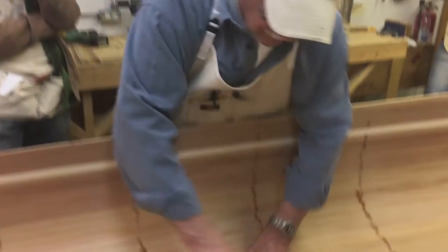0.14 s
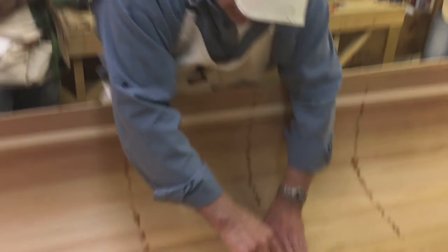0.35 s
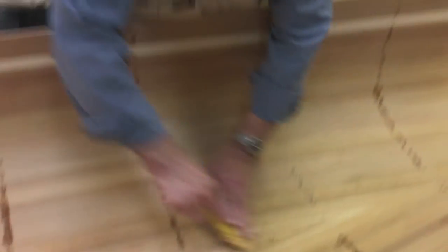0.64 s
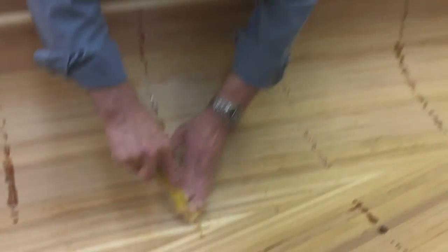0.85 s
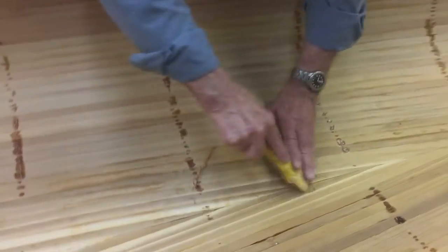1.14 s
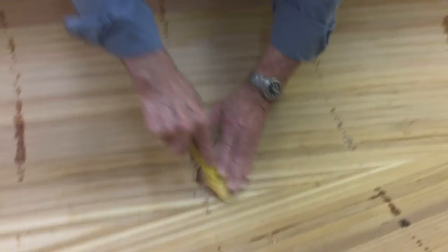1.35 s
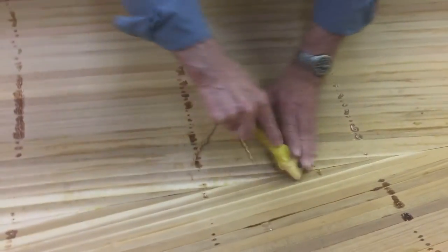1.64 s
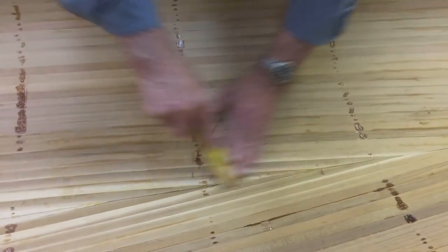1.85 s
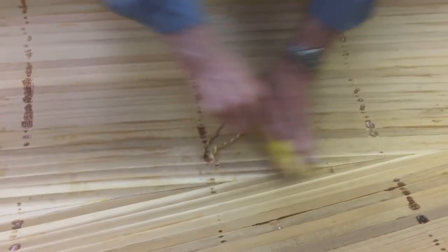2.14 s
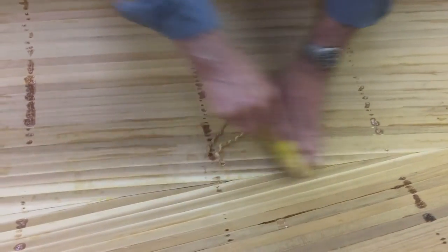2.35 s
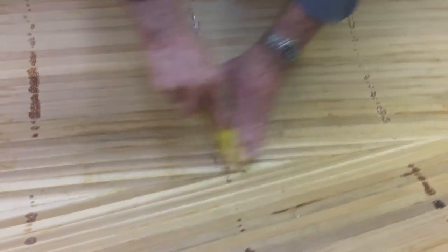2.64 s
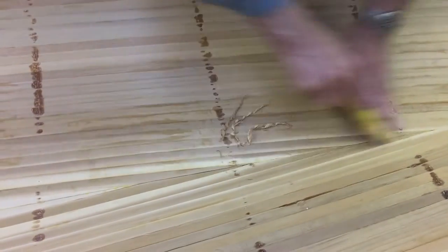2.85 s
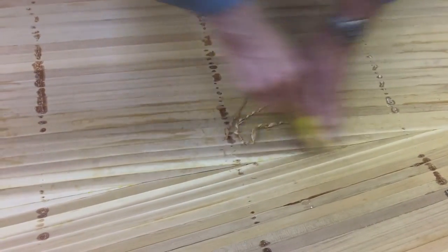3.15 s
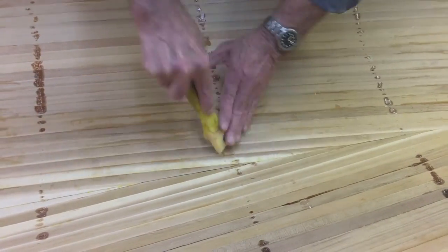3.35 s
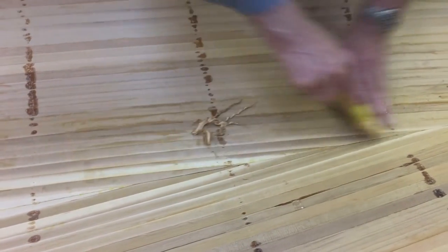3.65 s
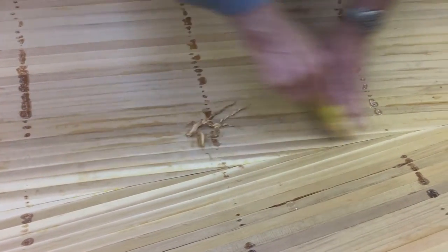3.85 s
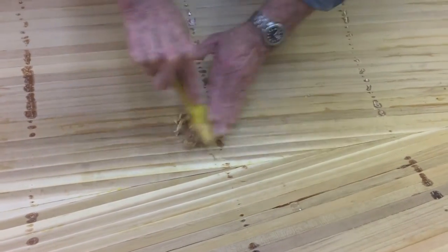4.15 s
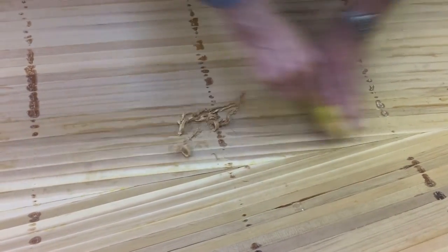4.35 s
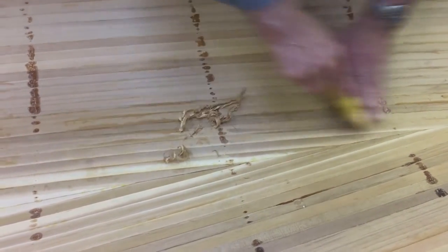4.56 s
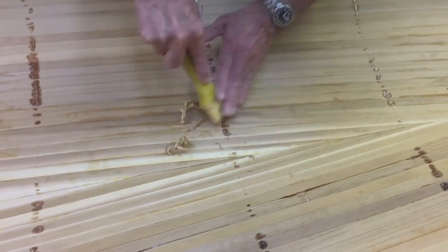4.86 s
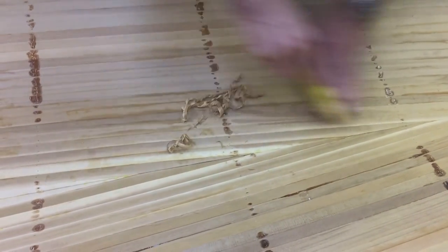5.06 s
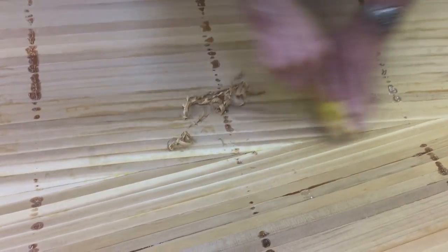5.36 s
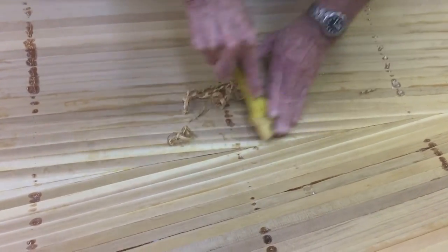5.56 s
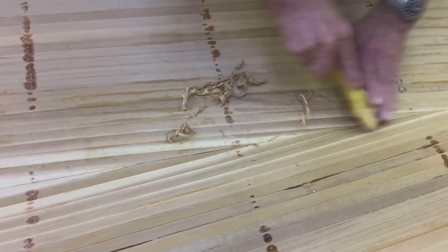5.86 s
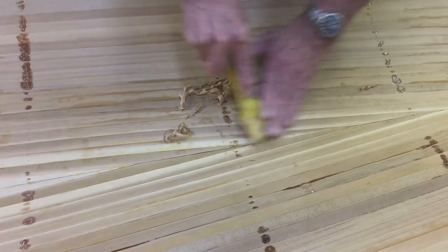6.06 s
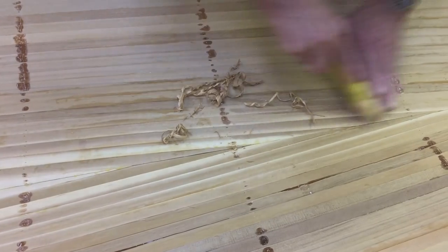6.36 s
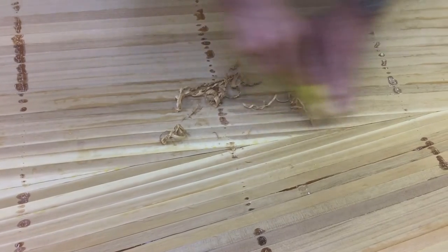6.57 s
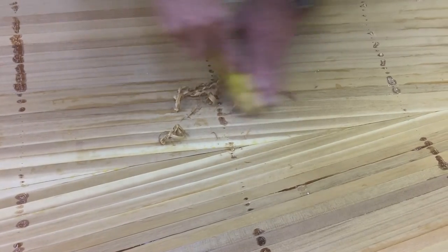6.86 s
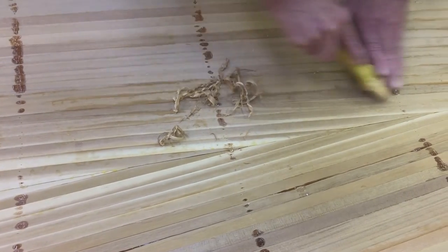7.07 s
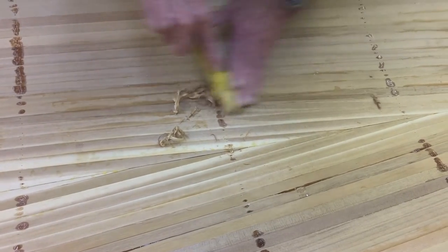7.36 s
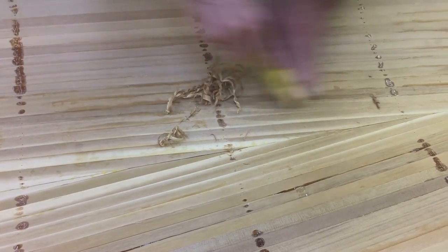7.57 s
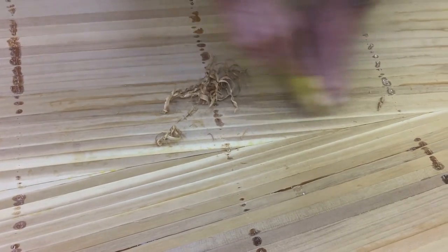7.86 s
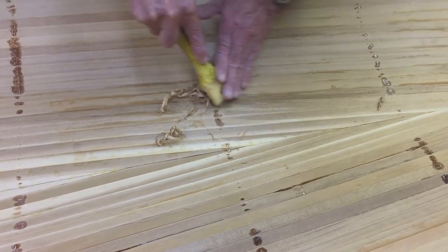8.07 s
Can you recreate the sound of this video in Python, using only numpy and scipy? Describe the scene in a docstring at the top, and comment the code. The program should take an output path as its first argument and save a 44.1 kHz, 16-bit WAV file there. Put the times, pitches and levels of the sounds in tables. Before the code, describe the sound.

A hand scraper rasps in twelve quick, bright pulls across a hollow thin wooden hull, with small thuds and clacks between strokes in a quiet workshop.

```python
"""In a workshop, a hand scraper works the inside of a thin wooden hull; one microphone close by, a quiet shop behind.
Between twelve quick pulls the blade is set down or slid lightly: steel clacks, the hull booms in its modes, the wood
is rubbed. In each pull it bites: random fibre fractures drive a dense rasp, a high singing edge and the planking.
Here and there come short bright crackles and brief chatter; a last light slide ends the work.
Room tails of decaying noise surround the blade, and steady shaped noise is the air of the shop."""
import sys
import numpy as np
from scipy import signal
from scipy.fft import rfft, irfft, next_fast_len
from scipy.io import wavfile

SR = 44100
rng = np.random.default_rng(int(sys.argv[2]) if len(sys.argv) > 2 else 0)


def generate_wav(signal):
    """Clip the signal to [-1, 1] and save it as 16-bit WAV at the path in sys.argv[1]."""
    frames = np.transpose(np.atleast_2d(signal))
    scaled = np.clip(frames, -1, 1) * 32767
    pcm = np.round(scaled).astype(np.int16)
    wavfile.write(sys.argv[1], SR, pcm)


N = 362061
TIME = np.arange(N) / SR   # s

PLANKING_FOLLOWS = 0.3   # share of the change in pressure that the hull follows
TOUCH_S, LIFT_S = 0.007, 0.0074   # the blade meets and leaves the wood


# Colour of the tearing fibres, close to the blade. Each row: frequency in Hz, relative density in dB per Hz.
RASP = [(500, -14), (1200, -1.5), (2100, 2), (2750, -1.5), (3230, 3.1), (3700, -1), (5200, -0.5),
        (6300, 1.5), (7000, -4), (7700, -12), (10000, -25), (16000, -39)]
# Colour of the singing steel edge. Each row: frequency in Hz, relative density in dB per Hz.
EDGE = [(5000, -27), (7600, -10), (8600, -1), (10200, 0), (11000, 1), (12400, 2), (13300, -6.5),
        (16000, -9.5)]


def cutting():
    """Tearing fibres drive the shaving, the steel edge and the hull together."""
    rasp, wood, edge = cut_gains()
    force = fibres(per_s=14000, spread_db=2.5, judder_db=0.96, judder_rate=300)
    heard = shifting_echoes(force, t60=0.026, echo_db=-8, rate=13)
    ringing = steel_ring(force, steel_pitch(glide_hz=480), width_hz=950)
    steel = from_db(-0.5) * colour(heard, EDGE) + from_db(-7.5) * ringing
    body = pressed(wood, force, modes_db=-4.5, dense_db=-5, bright_db=7.0)
    return from_db(-0.5) * rasp * colour(heard, RASP) + edge * steel + body


# The cutting pulls. Each row: start in seconds, length in seconds, run-up in seconds,
# pressure gained from start to end in dB, relative levels of rasp, planking and steel edge in dB,
# ring of the steel halfway through the pull in Hz.
CUTS = [ (0.486, .42, 0.054, -12, -24, -23.5, -29, 11280), (1.151, 0.33, 0.12, 4, -21, -20.5, -25.5, 11300),
        (1.715, 0.31, 0.096, -1.5, -22.5, -23.5, -27.5, 11070),
        (2.293, 0.38, 0.13, -16, -24, -21, -28.5, 11100),
        (2.983, 0.43, 0.051, -3.5, -20.5, -20.5, -27.5, 10900),
        (3.759, 0.39, 0.16, 1.5, -17, -19.5, -22.5, 10800),
        (4.498, 0.37, 0.099, 16, -21, -20.5, -26.5, 11060),
        (5.223, 0.35, 0.11, 15, -20.5, -22, -25.5, 11310), (5.852, 0.29, 0.093, 9, -21.5, -21, -27, 11310),
        (6.444, 0.38, 0.14, 3.5, -22, -19.5, -28.4, 11060),
        (7.118, 0.34, 0.061, 12, -21.5, -26, -26, 11200), (7.75, 0.36, 0.1, 18.5, -20, -21, -26, 11000)]
CUT_BRAKE_S = 0.16   # every pull slows down over this time
RASP_SWELL_DB, PLANKING_SWELL_DB, EDGE_SWELL_DB = 26.5, 17, 36.5   # gained from rest to full speed
EDGE_FADE_DB = 9.5   # the steel sings less and less along a pull
# in mid-stroke the blade glides and shakes the hull less (place and width as shares of the length)
GLIDE_AT, GLIDE_WIDTH, GLIDE_DIP_DB = 0.49, 0.15, 4
# harder and softer wood along the way: turns per second, spread in dB
GRAIN_PER_S, GRAIN_DB, GRAIN_PLANKING_DB = 28, 1.14, 2.83


def cut_gains():
    """Gains of rasp, planking and steel edge follow the speed and pressure of each pull and the grain of the wood."""
    rasp = wood = edge = 0
    for row in CUTS:
        contact, speed, way = stroke(row, CUT_BRAKE_S)
        press_db, rasp_db, wood_db, edge_db = row[3:7]
        press = press_db * (way - 0.5)
        slow = speed - 1
        glide = np.exp(-((way - GLIDE_AT) / GLIDE_WIDTH) ** 2)
        fade = EDGE_FADE_DB * (way ** 2 - 0.5 ** 2)
        hull_press = PLANKING_FOLLOWS * press - GLIDE_DIP_DB * glide
        rasp = rasp + contact * from_db(rasp_db + press + RASP_SWELL_DB * slow)
        wood = wood + contact * from_db(wood_db + hull_press + PLANKING_SWELL_DB * slow)
        edge = edge + contact * from_db(edge_db + press + EDGE_SWELL_DB * slow - fade)
    grain = from_db(GRAIN_DB * drift(GRAIN_PER_S))
    wood_grain = from_db(GRAIN_PLANKING_DB * drift(GRAIN_PER_S))
    return rasp * grain, wood * wood_grain, edge * grain


def steel_pitch(glide_hz):
    """The ring of the steel sinks in the course of every pull."""
    knots = []
    for start, length, *_, hz in CUTS:
        knots += [(start, hz + glide_hz), (start + length, hz - glide_hz)]
    return np.interp(TIME, *np.transpose(knots))


def steel_ring(force, centre_hz, width_hz):
    """A resonance with a moving centre; rms 1."""
    turn = np.exp(2j * np.pi * np.cumsum(centre_hz) / SR)
    # bring the moving centre down to 0 Hz, keep a narrow band there, and bring it back up
    lowpass = signal.butter(2, width_hz / 2, fs=SR, output="sos")
    return rms_one((turn * signal.sosfilt(lowpass, force / turn)).real)


def fibres(per_s, spread_db, judder_db, judder_rate):
    """Tiny fractures of uneven size, bunched by the stick and slip of the blade."""
    sizes = from_db(spread_db * np.minimum(rng.exponential(1, N), 5)) * rng.choice([-1, 1], N)
    happens = rng.random(N) < per_s / SR
    return rms_one(sizes * happens * from_db(judder_db * drift(judder_rate)))


def pressed(wood, force, modes_db, dense_db, bright_db):
    """A harder pull stiffens the contact: the upper modes of the hull gain while the lower ones yield."""
    body = planking(force, modes_db, dense_db)
    low = signal.sosfiltfilt(signal.butter(2, 600, fs=SR, output="sos"), body)
    push = np.clip(np.log10(wood / from_db(-21) + 1e-9), -0.5, 0.5)
    return wood * (low * from_db(-bright_db * push) + (body - low) * from_db(bright_db * push))


# Clear modes of the hull, also rung by the knocks. Each row: frequency in Hz,
# relative level when struck in dB, relative level when scraped in dB, time to fall 60 dB in seconds.
HULL = [(114.8, 19.5, -3.5, 0.14), (147, 14.5, 4.5, 0.14), (226, -17, -21, 0.48), (265.5, 4.5, -3, 0.12),
        (309.4, -15, 2, 0.057), (319.4, 5.5, 1, 0.18), (360, -14, -1.5, 0.047), (429.6, -2, -13, 0.66),
        (552, -29, -8, 0.26), (710.5, 3.5, 1, 0.4), (750, 13.5, -6.5, 0.037), (980, -1, -14, 0.054),
        (1110, -31, -5, 0.18), (1168.6, -47, 8, 0.13), (1702, -26, -4.5, 0.034), (2078, -28, 3.5, 0.15)]
# Colour of the dense crowd of scraped hull modes. Each row: frequency in Hz, relative density in dB per Hz.
PLANKING = [(30, -16), (92, -10), (120, 9), (145, 6.5), (175, -5.5), (250, 4), (370, 0), (600, -1),
            (900, 2), (1200, -3.5), (1400, -13), (2500, -34.5)]


def planking(force, modes_db, dense_db):
    """The scraped hull: a few clear modes over a dense crowd of others."""
    modes = 0
    for k, (hz, _, db, t60) in enumerate(HULL):
        modes = modes + (-1) ** k * from_db(db) * ring(force, hz, t60) / np.sqrt(t60)
    return from_db(modes_db) * rms_one(modes) + from_db(dense_db) * colour(force, PLANKING)


def shifting_echoes(x, t60, echo_db, rate):
    """Reflections inside the curved hull streak the spectrum, and change as the blade travels; rms 1."""
    age, echoes = TIME[:SR // 20], 0
    for weight in travel(rate, count=4):
        response = rng.standard_normal(len(age)) * from_db(-60 * age / t60)
        echoes = echoes + weight * rms_one(signal.oaconvolve(x, response)[:N])
    return rms_one(x + from_db(echo_db) * echoes)


# The blade set down on the hull. Each row: time in seconds, relative level of the thud in dB,
# relative level of the clack in dB, pitch of the spot in Hz.
KNOCKS = [(0.184, -8.5, -18, 170), (0.356, -13, -42, 190), (1.071, -18.5, -36, 170),
          (1.104, -14.5, -14.5, 260), (1.647, -15, -40, 210), (2.259, -10.5, -24, 250),
          (2.898, -6, -20, 261), (2.943, -14, -22, 250), (3.744, -9, -15.5, 240), (4.492, -9.5, -16.5, 221),
          (5.205, -6, -17, 390), (5.765, -14.5, -33, 220), (7.087, -5.5, -15.5, 310),
          (7.561, -23, -19, 200)]
# Colour of the thud before the spot favours its own pitch. Each row: frequency in Hz, relative density in dB per Hz.
THUD = [(30, -26), (50, -13), (80, 3), (120, -7), (175, -9.5), (235, 8.5), (400, 0), (580, -7), (800, -16),
        (1300, -61)]
# Colour of the steel's clack. Each row: frequency in Hz, relative density in dB per Hz.
CLACK = [(40, -19), (200, 11), (500, 7.5), (900, 13.5), (1200, 9.5), (1450, -5), (2200, -8), (4000, -25),
         (12000, -59)]


def knocks():
    """The steel ticks and clacks at once; the weight of the hands follows and the hull booms."""
    times, thud_db, clack_db, spot_hz = np.transpose(KNOCKS)
    tick = ring(clicks(times, clack_db + 10.0), hz=874, t60=0.0078)
    clack = sum(from_db(db) * burst(s, rise_s=0.0015, t60=0.26) for s, db in zip(times, clack_db))
    # each spot on the hull favours the modes near its own pitch
    focus_db = 2.0   # lost one octave away; grows with the square of the distance
    modes = 0
    for k, (hz, db, _, t60) in enumerate(HULL):
        levels_db = thud_db + db - focus_db * np.log2(hz / spot_hz) ** 2
        modes = modes + (-1) ** k * ring(clicks(times + 0.00748, levels_db), hz, t60)
    # heavy landings stir the crowd of small modes far more than light ones
    crowd, stir = 0, rng.standard_normal(N)
    for s, db, centre in zip(times, thud_db, spot_hz):
        spectrum = [(hz, level - focus_db * np.log2(hz / centre) ** 2) for hz, level in THUD]
        crowd = crowd + from_db(1.165 * db) * burst(s, rise_s=0.014, t60=0.19) * colour(stir, spectrum)
    clack = clack * colour(rng.standard_normal(N), CLACK)
    return tick + from_db(-5.5) * clack + from_db(-5.5) * crowd + from_db(-20.5) * modes


def clicks(times, levels_db):
    """One soft contact at each moment."""
    out = np.zeros(N)
    out[(times * SR).astype(int)] = from_db(levels_db)
    return signal.sosfilt(signal.butter(3, 1300, fs=SR, output="sos"), out + 1e-18)


# Colour of the light rub. Each row: frequency in Hz, relative density in dB per Hz.
RUB = [(400, 2.5), (1100, -1), (1450, 1.5), (2100, 3.5), (3700, -0.5), (6300, -7), (7800, -11.5),
       (10200, -16), (11700, -12), (13500, -24), (16000, -30)]


def sliding():
    """Between the pulls the unloaded blade only rubs and chatters."""
    rub, wood = slide_gains()
    force = fibres(per_s=4000, spread_db=2.0, judder_db=1.0, judder_rate=90)
    heard = shifting_echoes(force, t60=0.035, echo_db=-7.5, rate=10)
    body = pressed(wood, force, modes_db=-7.5, dense_db=-2.5, bright_db=5)
    return from_db(3.5) * rub * colour(heard, RUB) + body


# The blade sliding lightly over the wood. Each row: start in seconds, length in seconds, run-up in seconds,
# pressure gained from start to end in dB, relative level of the rub in dB, relative level of the planking in dB.
SLIDES = [ (0.175, 0.18, 0.024, -5.5, -38, -26), (0.418, 0.11, 0.084, -1, -35.5, -34),
          (1.066, .12, 0.029, -10.5, -37, -25), (1.639, 0.1, .008, 1, -39.5, -30),
          (2.892, 0.11, 0.0097, -17, -40, -24), (5.098, 0.19, 0.012, -5, -36.5, -23),
          (5.577, 0.18, .07, 4, -40, -29.5), (5.751, 0.12, .01, -5, -38, -28.5),
          (6.184, 0.26, 0.19, 8, -30.5, -24.5), (6.851, 0.24, 0.09, -11, -30, -23.5),
          (7.552, 0.21, 0.017, -7.5, -31.3, -24.5), (8.185, .1, 0.019, -1, -31.5, -20)]
SLIDE_BRAKE_S = 0.065
RUB_SWELL_DB, SLIDE_PLANKING_SWELL_DB = 16.5, 7   # gained from rest to full speed


def slide_gains():
    """Gains of rub and planking follow the speed and pressure of each slide."""
    rub = wood = 0
    for row in SLIDES:
        contact, speed, way = stroke(row, SLIDE_BRAKE_S)
        press_db, rub_db, wood_db = row[3:]
        press = press_db * (way - 0.5)
        hull_press = PLANKING_FOLLOWS * press
        rub = rub + contact * from_db(rub_db + press + RUB_SWELL_DB * (speed - 1))
        wood = wood + contact * from_db(wood_db + hull_press + SLIDE_PLANKING_SWELL_DB * (speed - 1))
    return rub, wood


def stroke(row, brake_s):
    """One movement of the hands runs up, holds and brakes: (contact 0-1, speed 0-1, share of the way done)."""
    start, length, run_up = row[:3]
    age, left = TIME - start, start + length - TIME
    contact = np.clip(np.minimum(age / TOUCH_S, left / LIFT_S), 0, 1)
    speed = np.sin(np.pi / 2 * np.clip(np.minimum(age / run_up, left / brake_s), 0, 1))
    return contact, speed, np.clip(age / length, 0, 1)


# Short bright crackles: the blade snagging in the grain, or steel ticking as it is set down.
# Each row: time in seconds, relative level in dB.
CRACKLES = [(0.561, -9), (0.612, -15), (3.997, -23), (5.349, -8), (7.089, -23), (7.93, -9)]


def crackles():
    """A short bright crackle of many fractures, as the edge snags in the grain or the steel ticks when set down."""
    envelope = sum(from_db(db - 8) * burst(s, rise_s=0.0046, t60=0.082) for s, db in CRACKLES)
    force = fibres(per_s=13000, spread_db=-1.0, judder_db=2.0, judder_rate=320)
    return envelope * (colour(force, RASP) + from_db(-2) * colour(force, EDGE))


# The blade chattering on hard grain. Each row: time in seconds, relative level in dB.
CHATTERS = [(0.645, -24), (3.997, -16.5), (4.72, -22), (6.03, -44), (7.564, -20)]


def chatters():
    """For a moment the blade judders and two upper modes of the wood flare up."""
    envelope = sum(from_db(db) * burst(s, rise_s=0.0091, t60=0.17) for s, db in CHATTERS)
    force = rng.standard_normal(N)
    upper = rms_one(ring(force, hz=1180, t60=0.025))
    lower = rms_one(ring(force, hz=740, t60=0.02))
    return envelope * (upper + from_db(-2.5) * lower)


def workshop(x, wet_db, gap_s):
    """Direct sound plus the room, which answers differently to each place of the blade."""
    wet = sum(signal.oaconvolve(weight * x, room_tail(gap_s))[:N] for weight in travel(rate=5, count=3))
    return x + from_db(wet_db) * wet


def travel(rate, count):
    """Slow crossfades of constant power between several places of the blade."""
    weights = np.array([drift(rate) for _ in range(count)])
    return weights / np.linalg.norm(weights, axis=0)


# Reverberation of the workshop. Each row: frequency in Hz, time to fall 60 dB in seconds.
ROOM_T60 = [(100, 0.29), (260, 0.71), (700, 0.58), (1840, 0.62), (4850, 0.51), (12800, 0.17)]


def room_tail(gap_s):
    """A diffuse response of unit energy, built up over the gap, in which the treble dies first."""
    age, tail = TIME[:int(SR * 0.8)], 0
    edges = np.geomspace(40, 18000, 11)   # Hz
    for low, high in zip(edges, edges[1:]):
        bandpass = signal.butter(2, [low, high], "band", fs=SR, output="sos")
        band = signal.sosfilt(bandpass, rng.standard_normal(len(age)))
        tail = tail + band * from_db(-60 * age / at_hz(ROOM_T60, np.sqrt(low * high)))
    tail = tail * (1 - np.exp(-(age / gap_s) ** 2))
    return tail / np.linalg.norm(tail)


# Colour of the background in the shop. Each row: frequency in Hz, relative density in dB per Hz.
SHOP = [(15, -30), (25, -7), (41, -6), (64, -15.5), (223, -8.5), (775, -16), (1070, -15), (1400, -17.5),
        (2350, -19), (7310, -29), (11600, -35), (16000, -36)]


def shop_air():
    """The quiet air of the shop: steady noise, strongest in the bass."""
    return from_db(-45.0) * colour(rng.standard_normal(N), SHOP)


def ring(force, hz, t60):
    """A damped resonator: a unit click sets a sine of height 1 ringing."""
    r, w = from_db(-60 / (t60 * SR)), 2 * np.pi * hz / SR
    return signal.lfilter([0.5, 0, -0.5], [1, -2 * r * np.cos(w), r * r], force + 1e-18)


def burst(start, rise_s, t60):
    """Envelope that swells and dies; top 1."""
    age = np.maximum(TIME - start, 0)
    shape = (1 - np.exp(-age / rise_s)) * from_db(-60 * np.minimum(age / t60, 4))
    return shape / (shape.max() + 1e-12)


def drift(rate):
    """Smooth chance with so many turns a second; rms 1."""
    return rms_one(np.interp(TIME * rate, np.arange(N // 20), rng.standard_normal(N // 20)))


def colour(x, spectrum):
    """Give a steady signal a spectrum; rms 1."""
    size = next_fast_len(len(x))
    hz = np.arange(size // 2 + 1) * SR / size
    shaped = rfft(x, size) * from_db(at_hz(spectrum, hz))
    return rms_one(irfft(shaped, size)[:len(x)])


def at_hz(points, hz):
    """Read a table on a log-frequency axis."""
    known, values = np.transpose(points)
    return np.interp(np.log(np.maximum(hz, 1)), np.log(known), values)


def rms_one(x):
    """Scale to unit rms."""
    return x / np.sqrt(np.mean(x ** 2) + 1e-20)


def from_db(db):
    """Decibels to gain."""
    return 10 ** (np.asarray(db) / 20)


def scene():
    """Scraper and hull in the room, over the quiet air of the shop; the same in both channels."""
    scraping = workshop(cutting() + sliding() + crackles() + chatters(), wet_db=-7.0, gap_s=0.0018)
    work = scraping + workshop(knocks(), wet_db=-11, gap_s=0.017)
    # thin planking radiates little deep bass
    work = signal.sosfilt(signal.butter(2, 72, "high", fs=SR, output="sos"), work)
    return np.tile(work + shop_air(), (2, 1))


CUTOFF_HZ = 15850


def record(dry):
    """The highest peaks are rounded, the top is cut."""
    rounded = dry / (1 + (dry / 0.85) ** 6) ** (1 / 6)
    return signal.sosfilt(signal.ellip(12, 0.1, 90, CUTOFF_HZ, fs=SR, output="sos"), rounded)


dry = scene()
out = record(dry)
generate_wav(out)
```